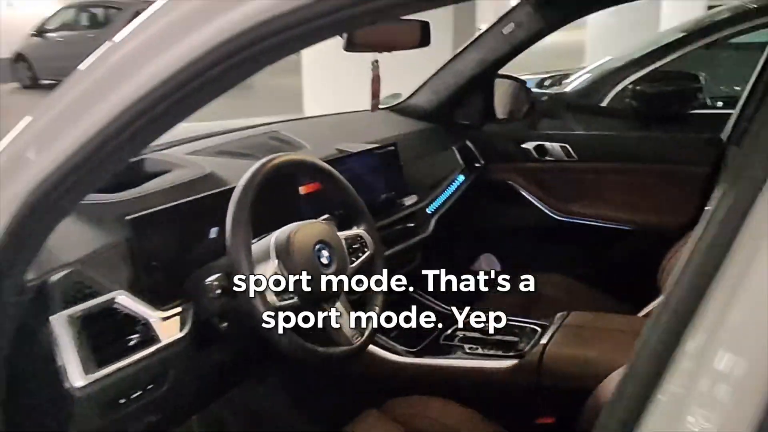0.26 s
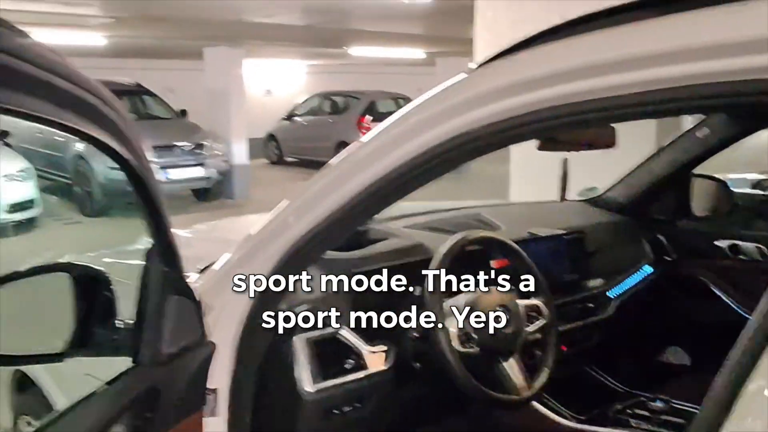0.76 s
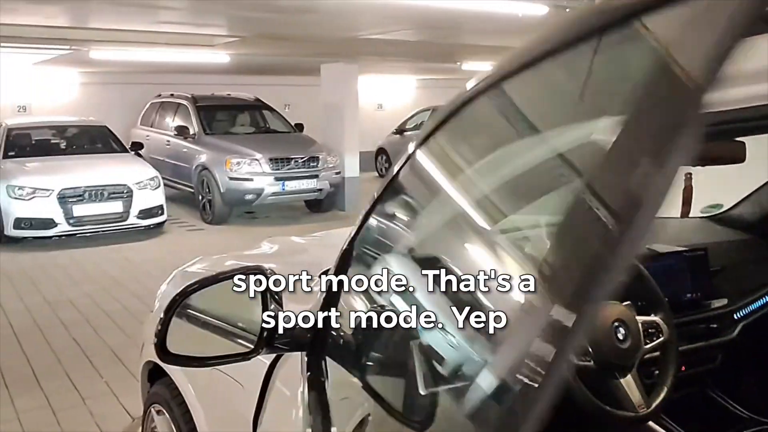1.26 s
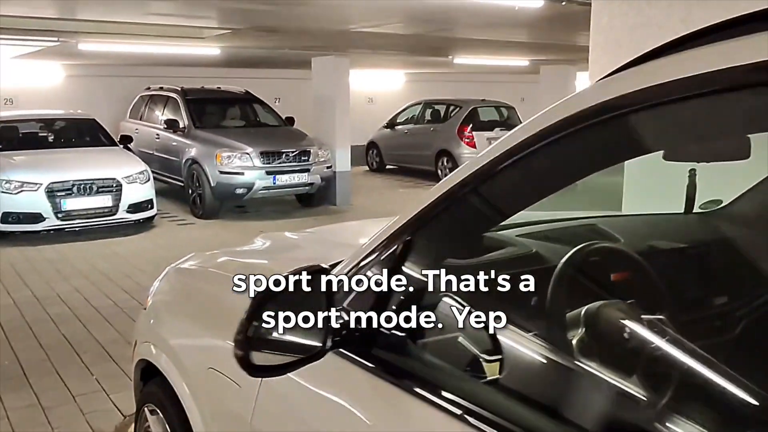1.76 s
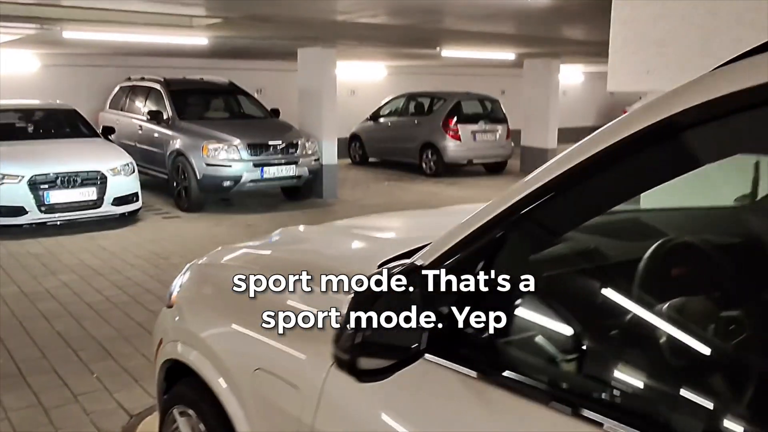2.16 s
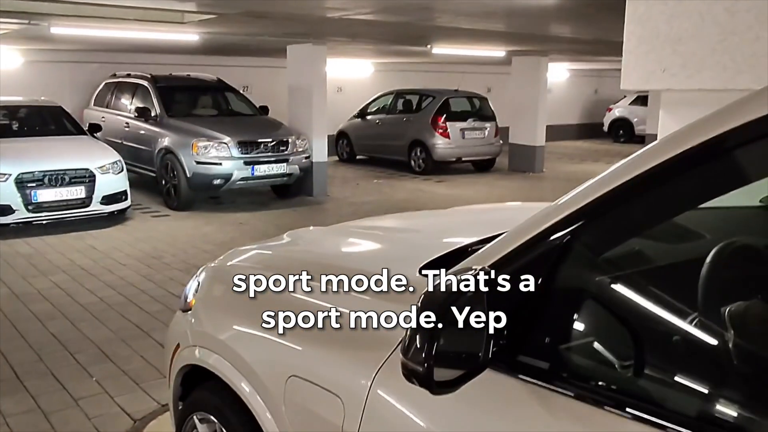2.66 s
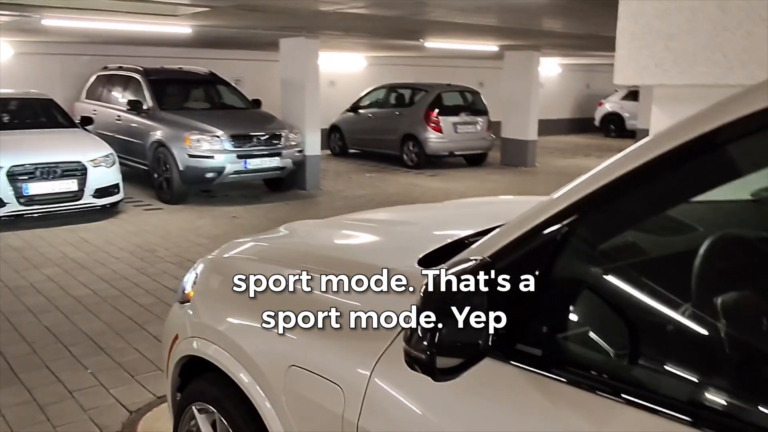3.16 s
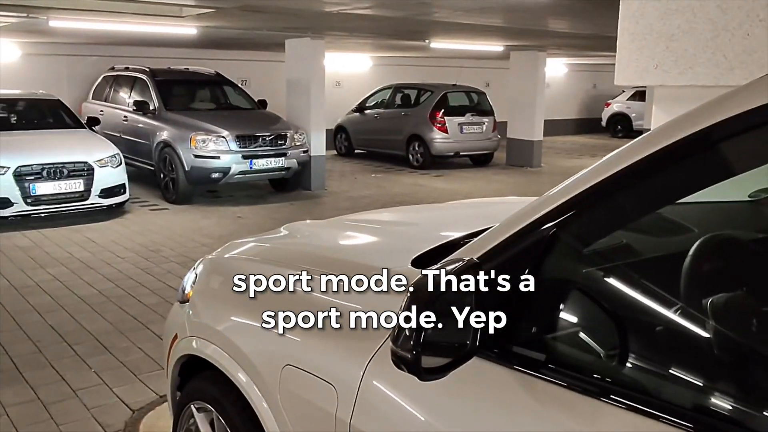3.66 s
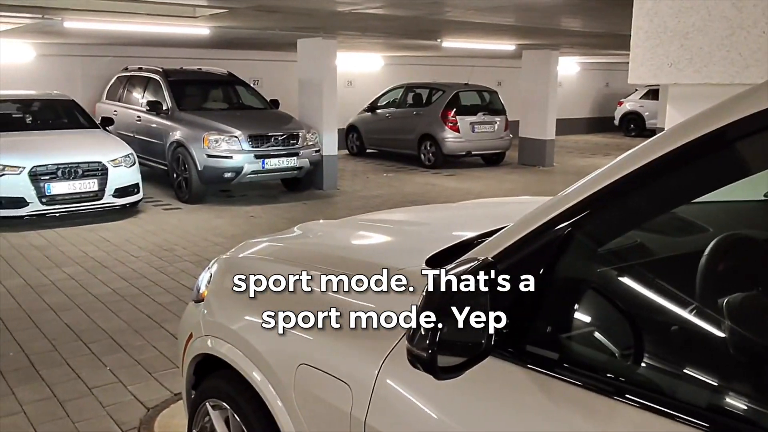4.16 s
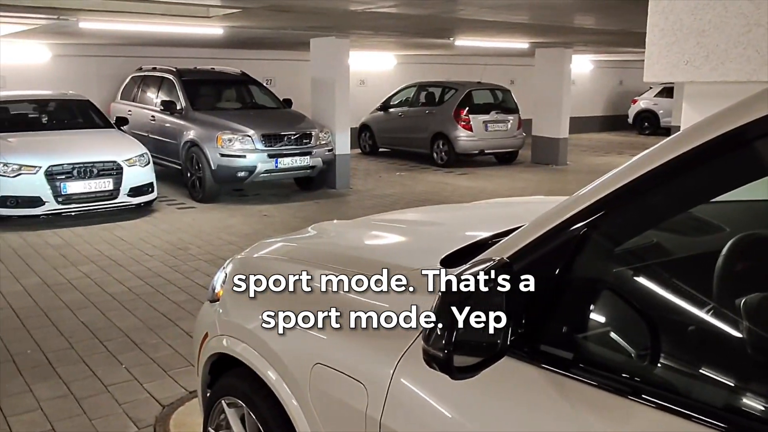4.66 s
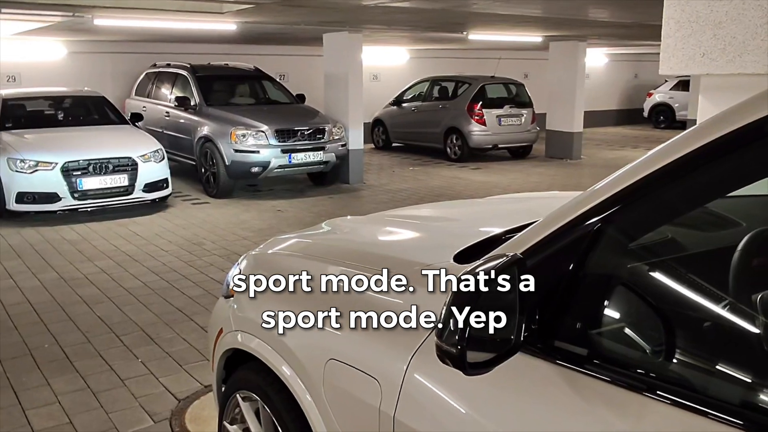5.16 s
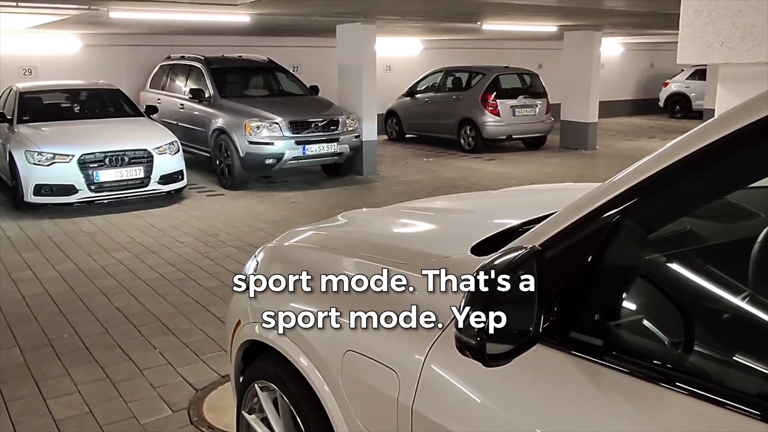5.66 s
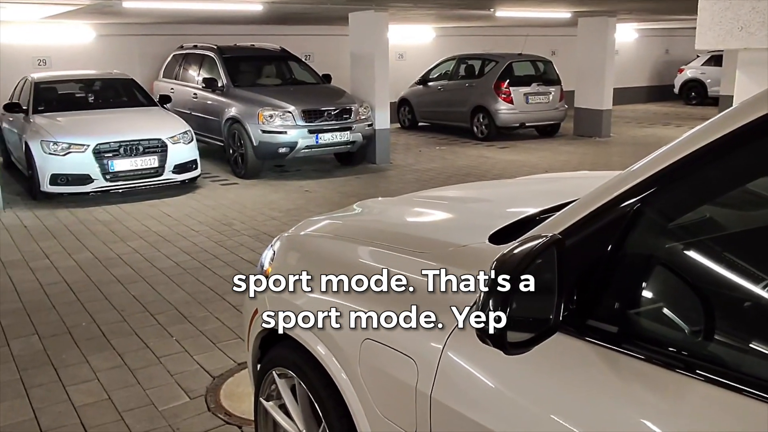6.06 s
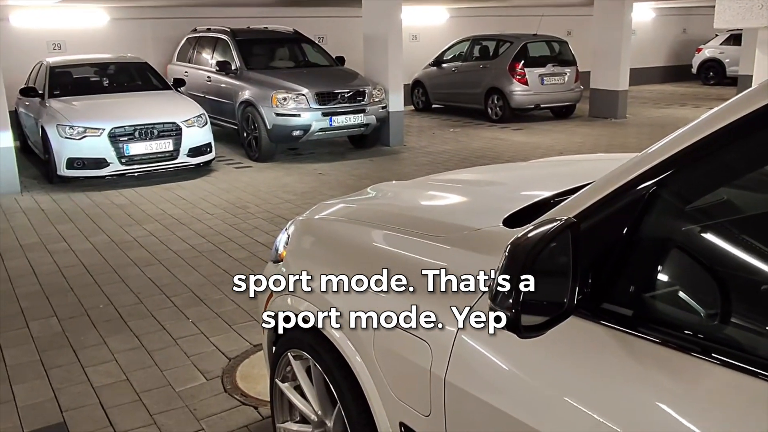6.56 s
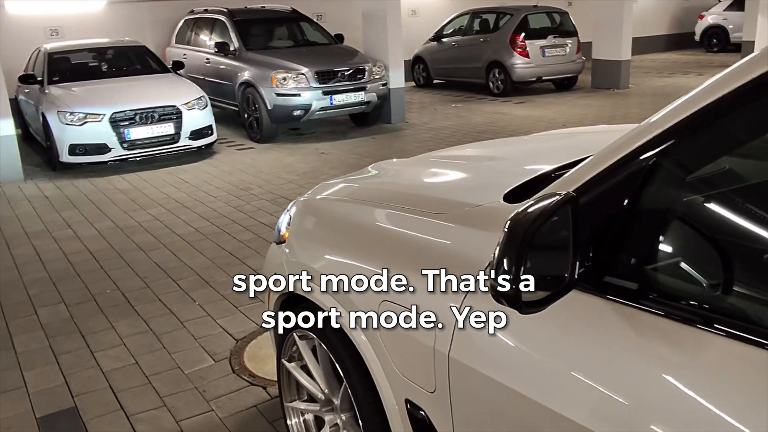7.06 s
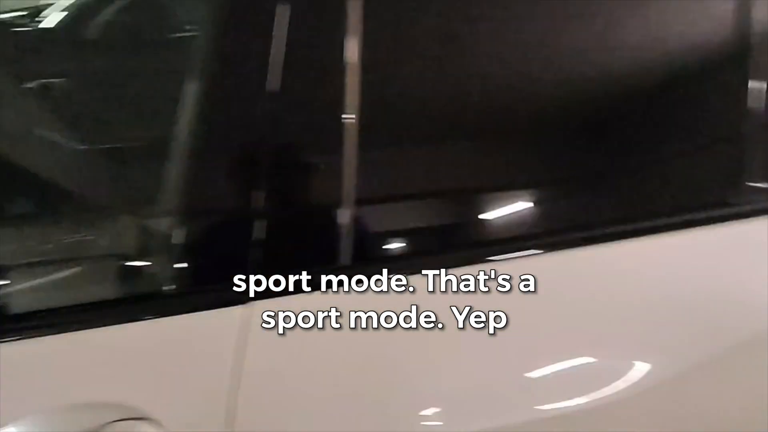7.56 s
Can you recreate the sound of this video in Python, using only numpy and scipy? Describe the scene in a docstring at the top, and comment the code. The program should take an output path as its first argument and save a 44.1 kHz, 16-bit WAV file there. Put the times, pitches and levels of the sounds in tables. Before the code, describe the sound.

Shoes scuff in an underground garage, a car door clicks and slams, a short hum follows, then a compressor spins up into a steady buzzing whine.

```python
"""A car's suspension compressor spins up and whines: each shaft turn is one blow that makes its housing ring.
Before and around it, shoes scuff, the door's check strap clicks and knocks, and the door slams:
short pushes and bursts of noise set small parts, panels and body ringing. An actuator hums as a few sine tones.
This is an underground garage: far air handling hisses and rumbles as shaped noise,
and bare concrete answers the blows with a fading noise tail."""
import sys
import numpy as np
from scipy import signal
from scipy.fft import rfft, irfft, next_fast_len
from scipy.io import wavfile
from scipy.ndimage import map_coordinates

SR = 44100
rng = np.random.default_rng(int(sys.argv[2]) if len(sys.argv) > 2 else 0)


def master(y):
    """Save y as 16-bit WAV."""
    cut = np.clip(np.atleast_2d(y).T, -1, 1)
    pcm = np.round(cut * 32767)  # scale
    wavfile.write(sys.argv[1], SR, pcm.astype(np.int16))


N = 343980
TIME_S = np.arange(N) / SR

# In every swell table, rise_s and fall_s are the times taken to climb or sink by 20 dB.
# Far hiss of the garage: pitch_hz, level_db (per Hz, relative)
AIR_TONE = [(76, -18), (130, -16), (166, -23), (233, -38.5), (329, -27), (1200, -51), (1380, -64.5),
            (1620, -53.5), (2110, -49.5), (2970, -55), (4360, -59.5), (6800, -34.5), (10400, -62),
            (14900, -42.5), (16200, -49.5)]
# Thin steady electrical tone: pitch_hz, level_db
WHISTLE = [(13840, -91)]
# Low air pushes at the microphone: peak_s, level_db, rise_s, fall_s
RUMBLE = [(.05, -62, 0.25, 0.97), (.61, -55, 0.37, 0.23), (1.1, -53, 0.15, 0.39),
          (1.75, -42.5, 0.079, 0.18), (2.0, -50.5, 0.24, 1), (3.05, -66, 0.26, 0.49),
          (4.29, -59.5, 0.25, 0.4), (5.05, -65.5, 0.49, 0.93), (6.1, -74.5, 0.6, 0.92)]
# Colour of those pushes: pitch_hz, level_db (per Hz, relative)
RUMBLE_TONE = [(18, -37.5), (28, -0.5), (40, 2.5), (63, 4.5), (81, 2), (110, -7), (140, -28), (240, -120)]
AIR_DB, RUMBLE_FLOOR_DB = -69, -77.5
# Life of the concrete's answer: pitch_hz, fade_s (time to fall 60 dB)
GARAGE = [(40, 0.46), (150, 0.45), (600, 0.43), (2500, 0.76), (6000, 0.21), (12000, 0.12)]

# Dull shuffles of clothes and feet: peak_s, level_db, rise_s, fall_s
SHUFFLES = [(.01, -61.5, .1, 0.34), (.41, -63.5, 0.19, 0.26), (.72, -60.5, 0.24, 0.17),
            (1.4, -71.5, 1, 0.25), (1.1, -63, 0.04, 0.18), (1.6, -65, 0.027, 0.3), (1.95, -54, 0.32, 0.24),
            (2.44, -63, 0.64, 0.31), (2.97, -56.5, 0.064, 0.091), (3.06, -65.5, .5, 0.21),
            (4.25, -53, 0.11, 0.093), (5.02, -58, 0.38, 0.75)]
# Colour of the shuffles: pitch_hz, level_db (per Hz, relative)
SHUFFLE_TONE = [(60, -30.5), (120, 1.5), (200, 2), (330, -1.5), (500, -7.5), (800, -7.5), (1200, -15),
                (2000, -40), (3300, -120)]
# Scuffs of shoes on the floor: peak_s, level_db, rise_s, fall_s, left_over_right_db
SCUFFS = [(.01, -60.5, 0.18, 0.49, 0), (.235, -52.5, 0.078, 0.084, 1.5), (0.39, -48, 0.0085, 0.091, 0.5),
          (0.414, -55, 0.083, 0.012, 1), (.44, -58.5, 0.024, 0.019, 12), (2.0, -68.5, 0.59, 0.79, -1),
          (2.33, -69, 0.14, 0.21, 0), (2.47, -65, .2, 0.34, -2.5), (5.17, -72.5, .4, .3, -2.5)]
# Colour of the scuffs: pitch_hz, level_db (per Hz, relative)
SCUFF_TONE = [(410, -28.5), (700, -19.5), (863, -11), (946, -33.5), (1080, -10.5), (1460, -8), (2130, -11),
              (2530, -6.5), (3840, -11), (5690, -8.5), (10400, -24), (15000, -16.5), (16000, -49)]
SHUFFLE_FLOOR_DB = -79.5
RUSTLE_DB, RUSTLE_ENDS_S = -73.5, 3.06  # faint rubbing between the scuffs until the feet rest

# Actuator hum: start_s, length_s, level_db, fade_db_per_s (below zero means it grows)
HUM = [(2.11, 0.92, -57, -1.5), (4.17, 0.13, -57.5, -9), (4.3, 0.3, -55, 31)]
HUM_HZ, HUM_EDGE_S = 120, 0.032
# Brief hollow rushes of air under the car: peak_s, level_db, rise_s, fall_s
VENT = [(4.865, -62, 0.019, 0.34), (5.19, -65, 0.2, 0.2)]
# Small cavities the air rings in: pitch_hz, width_hz, level_db (relative)
VENT_CAVITIES = [(830, 120, -11), (2300, 68, -0.5), (2490, 162, -3.5), (3220, 170, -18)]

# Small contacts: start_s, click_peak_db, knock_peak_db, click_hz, knock_hz, left_over_right_db (click)
CONTACTS = [(0.384, -45, -62, 1534, 345, 0), (0.394, -45.5, -64, 1500, 298, 0),
            (0.41, -49, -53, 1600, 308, 2), (0.447, -49, -54, 2000, 110, 0),
            (0.584, -50, -63, 2500, 420, 10), (0.589, -55, -41, 2000, 430, 21),
            (0.5941, -40.5, -38.5, 4050, 555, 14.5), (0.601, -64, -38, 2000, 307, 7),
            (0.615, -60, -47, 2500, 170, 0), (0.624, -62, -48, 1500, 197, 0),
            (0.639, -78, -48, 1500, 69, 0), (0.6826, -41, -47.5, 6200, 88, 9),
            (0.7552, -43.5, -53, 5160, 100, 8), (0.8654, -98, -51, 1630, 437, -6),
            (0.993, -68, -50, 1490, 296, -4), (1.0088, -53, -42.5, 2730, 198, 9),
            (1.02, -59, -50, 3500, 300, -5), (1.059, -62, -32, 900, 200, -10),
            (1.065, -53, -31.5, 1100, 560, -17), (1.071, -70, -39, 900, 600, -10),
            (1.078, -70, -34, 900, 150, 0), (1.113, -80, -44.5, 900, 132, 0),
            (1.2243, -60, -65, 3050, 199, -1), (1.245, -71, -72, 2800, 100, 2),
            (1.3309, -67, -44, 1510, 216, -13), (1.3416, -54, -40.5, 2300, 223, -11),
            (1.349, -68, -45, 1200, 294, -15), (1.363, -72, -50, 1500, 180, -2),
            (1.413, -54, -50, 2490, 498.3, -10), (1.4197, -55, -43.5, 2230, 885, -31.5),
            (1.5801, -80, -50.5, 2026, 183, 0), (1.948, -53.5, -42, 12230, 90.5, -7),
            (2.1855, -56.5, -53.5, 4050, 202, -19), (2.914, -53.5, -67, 4070, 116, -12),
            (2.928, -45.5, -54, 7430, 120, -10.5), (2.945, -57, -42.5, 1515, 149, -4),
            (2.973, -52, -48, 1390, 315, -14), (3.029, -59, -49.5, 1506, 168, -2),
            (4.179, -69, -48, 1180, 138, -2), (4.2, -70, -49, 900, 130, 0), (4.219, -70, -48, 890, 200, 0),
            (4.239, -53, -38.5, 678, 140, -11), (4.247, -74, -35, 900, 90, 0),
            (4.252, -66, -46, 900, 480, 0), (4.276, -72, -40, 900, 100, 0),
            (4.8512, -50.5, -40.5, 2400, 480, -4), (4.853, -68, -44, 1490, 150, -1),
            (4.875, -56, -55, 1485, 500, -1), (4.919, -61, -41.5, 1200, 91, -2),
            (4.969, -70, -51, 1200, 290, 0), (5.046, -68, -55, 1200, 266, 0),
            (5.081, -71, -61, 1196, 325, 0), (5.155, -60, -53, 1205, 274, 0),
            (5.384, -59, -55, 1220, 236, 2), (6.333, -49, -85.5, 10000, 299, -6)]
# Colour of the bright clicks: pitch_hz, level_db (per Hz, relative)
CLICK_TONE = [(470, -29), (800, 5.5), (1680, 3.5), (2350, -1.5), (4570, -5.5), (7170, -5), (10600, -23.5),
              (12800, -5), (15400, -5), (16000, -40)]
CLICK_FADE_S, CLICK_WIDTH = 0.048, 3.7  # time to fall 60 dB; width as share of the pitch
# Knock: fade time at 100 Hz; higher knocks die sooner by this power of their pitch; width as share of pitch
KNOCK_FADE_S, KNOCK_SHORTENS, KNOCK_WIDTH = 0.25, 0.29, .17
# The push behind a knock: life and share of its rough part, share that takes a broader, shorter ring
PUSH_FADE_S, PUSH_ROUGH, PUSH_BROAD = .05, .8, .2

# Contacts within the door slam: start_s, panel_and_thud_db, rattle_db (relative)
SLAM = [(1.732, -41, -34.5), (1.745, -28, -14), (1.754, -16.5, -14.5), (1.765, -25.5, -19),
        (1.776, -33.5, -27), (1.789, -50.5, -30.5)]
# Door panels: pitch_hz, level_db (relative, before random scatter), fade_s (time to fall 60 dB)
PANELS = [(31.8, -13.5, 0.99), (60, -7, 0.59), (104, -0.5, 0.37), (141, -3, 0.25), (145.5, -5.5, 0.33),
          (216, 3, 0.13), (250.3, -23, 0.19), (336.5, 0.5, 0.12), (374, -14.5, 0.17), (479, 3, 0.049),
          (548.4, 7, 0.048), (645, -30, 0.97), (780, -7, 0.047), (745, -24.5, 0.22), (1049, -9, 0.049),
          (1513, -17.5, 0.043), (1439, -26, 0.035), (1780, -25.5, .05), (2620, -24, .04)]
# Colour of the latch and trim rattle: pitch_hz, level_db (per Hz, relative)
RATTLE_TONE = [(150, -59), (350, -12), (600, -4), (717, -13.5), (1070, -20.5), (1680, -20.5), (2650, -22.5),
               (2990, -30), (5630, -31.5), (6120, -28.5), (6550, -28.5), (10700, -50), (14500, -38),
               (16000, -60)]
# Colour of the body's thud: pitch_hz, level_db (per Hz, relative)
THUD_TONE = [(15, -31.5), (25, -17), (54, 3.5), (80, -8), (110, 2), (151, -2), (381, -20), (452, -16.5),
             (565, -12), (648, -16), (800, -18.5), (1500, -36), (1950, -59.5), (3300, -120)]
# Life of the thud: pitch_hz, fade_s (time to fall 60 dB)
THUD_LIFE = [(30, 0.64), (100, 0.29), (300, 0.45), (600, 0.037), (1500, 0.057)]

# Shaft speed, a quick spin-up and then a slow sag as pressure builds: time_s, turns_hz
SPEED = [(3.05, 31), (3.15, 37.5), (3.29, 45.3), (3.35, 48.6), (3.6, 59.2), (3.66, 59.5), (3.92, 58.6),
         (4.39, 57.6), (5.26, 56.45), (6.29, 55.4), (6.49, 54.1), (6.57, 54.1), (6.63, 54.5), (6.81, 54.8),
         (7.11, 54.6), (7.56, 53.8), (7.8, 53.7)]
# Strength of the compressor's blows: time_s, level_db (relative)
BLOW_LEVEL = [(3.05, -67.5), (3.15, -63), (3.3, -61.5), (3.66, -50.5), (4.08, -51), (5.22, -51.5),
              (5.6, -52.5), (6.4, -54), (6.5, -54), (7.28, -51.5), (7.6, -54), (7.8, -54)]
# Multiples of the shaft speed that stand out or drop back: multiple, level_db (relative)
BLOW_SHAPE = [(8, 1.5), (9, -8.3), (10, -3.8), (12, 3.5), (13, 5.7), (14, 5.1), (15, -4.1), (16, -1.7),
              (20, -1.8), (21, -7.9), (22, -2.6), (23, 4.9), (25, 4.8), (27, 2.1), (31, -9.0), (32, -5.2),
              (33, -2.3), (34, -4.9), (35, -6.7), (37, -7.9), (38, -2.3), (40, 6.4), (43, 2.4), (45, 2.0),
              (47, 4.2), (49, 2.1), (50, -2.0), (54, 3.8), (55, 3.7), (58, 3.3), (60, 5.2), (61, 2.9),
              (62, 4.0), (63, 3.3)]
# Ringing of housing, brackets and body shell: pitch_hz, width_hz, level_db (relative), sign_of_ring
HOUSING = [(485.6, 24, -10.4, 1), (556.0, 31, -9.7, -1), (619.6, 35, -8.1, 1), (683.9, 85, -19.1, -1),
           (773.4, 8, -21.9, 1), (881.6, 49, 3.4, -1), (878.5, 37, 5.0, 1), (923.0, 9, -7.4, -1),
           (964.5, 21, -1.2, 1), (997.5, 31, -2.3, -1), (1044.1, 23, -5.9, 1), (1068.0, 8, -8.2, -1),
           (1087.5, 46, -8.0, 1), (1136.8, 31, 3.0, -1), (1196.5, 26, -5.9, 1), (1246.0, 11, -2.5, -1),
           (1240.8, 35, -6.0, 1), (1293.9, 16, -4.9, -1), (1311.9, 16, -3.6, 1), (1370.6, 26, -6.6, -1),
           (1424.0, 14, -15.3, 1), (1444.1, 10, -14.8, -1), (1561.4, 15, -19.1, 1), (1599.1, 18, -15.7, -1),
           (1667.0, 23, -17.2, 1), (1733.5, 64, -1.1, -1), (1771.3, 98, 2.4, 1), (1801.8, 67, 1.7, -1),
           (1895.0, 35, -5.1, 1), (1932.2, 29, 1.0, -1), (1975.0, 57, -3.5, 1), (2103.5, 19, -7.0, -1),
           (2132.7, 18, -16.8, 1), (2218.6, 106, -2.2, -1), (2215.2, 160, -3.4, 1), (2333.6, 52, -15.0, -1),
           (2423.3, 61, -19.7, 1), (2549.9, 22, -14.1, -1), (2598.1, 17, -18.1, 1), (2681.0, 34, -14.4, -1),
           (2748.1, 32, -17.9, 1), (2865.1, 62, -15.8, -1), (2963.7, 21, -10.0, 1), (3065.0, 89, -11.0, -1),
           (3106.0, 95, -12.4, 1), (3225.8, 24, -16.5, -1), (3317.0, 160, -21.4, 1),
           (3335.0, 28, -16.8, -1), (3421.6, 43, -20.1, 1), (3528.8, 53, -20.1, -1), (3660.0, 54, -21.6, 1)]
# Ringing of the valve plate: pitch_hz, width_hz, level_db (relative)
PLATE = [(3890, 56, -16), (4180, 83, -23.5), (4437, 35, -14.5), (4600, 60, -18.5), (4894, 43, -19),
         (5224, 59, -19.5), (5580, 59, -19.5), (5860, 90, -25.5), (7310, 150, -23)]
# Colour of the air through the valves: pitch_hz, level_db (per Hz, relative)
VALVE_AIR_TONE = [(240, -13.5), (400, -8), (620, -16), (790, -16), (1000, -6), (1350, -8), (1550, -14.5),
                  (1950, -13.5), (2300, -15), (3050, -16), (3600, -16), (4100, -23), (4600, -17.5),
                  (7500, -26), (8900, -27.5), (10300, -49), (13300, -21.5), (16000, -70)]
# How alike left and right are in the valve air: pitch_hz, likeness (1 = same, -1 or less = opposite)
VALVE_AIR_LIKENESS = [(60, -1.1), (180, 0.54), (550, -0.35), (1650, 0.52), (4970, 0.92), (15000, -0.3)]
# Colour while the shaft is slow: pitch_hz, width_hz, added_gain
SPIN_UP = [(620, 350, -0.14), (800, 160, .5), (1000, 120, -0.64), (1120, 60, 0.28), (1400, 150, 0.84),
           (1854, 210, -0.41), (2000, 240, -0.46), (2160, 82, 0.25), (2520, 230, 1), (3350, 200, .6),
           (5000, 1500, -.4)]
# Colour once the listener has shifted nearer the wheel: pitch_hz, width_hz, added_gain
NEARER = [(5050, 360, 0.86), (2220, 200, 0.29), (2000, 150, -0.21), (1322, 170, -0.018), (3300, 270, -0.28)]
# Colour midway through the listener's turn: pitch_hz, width_hz, added_gain
PASSING = [(2180, 180, 0.46), (2590, 370, 0.32), (828, 170, -0.35), (4900, 300, 0.32)]
# Colour after the turn: pitch_hz, width_hz, added_gain
TURNED = [(1113, 130, 0.73), (1190, 90, -0.83), (1902, 820, -0.6), (2196, 170, -.6), (2567, 320, 0.36),
          (2780, 150, 0.42), (2900, 150, -0.91), (3260, 200, 0.85), (4600, 330, -0.9), (5300, 250, 0.78)]
# Slow wander of the ring's level: pitch_hz, wander_db
DRIFT = [(600, .5), (2000, 1), (3500, 1.6), (6000, 3)]
FIRST_BLOW_S, AIR_BUILDS_S = 3.079, 0.068  # air noise is full this long after the first blow
# Air noise at full flow; its loss per turn per second below that speed
VALVE_DB, VALVE_DB_PER_HZ, FULL_FLOW_HZ = -63, 0.35, 55.5
SPIN_UP_S, NEARER_S = (3.595, 3.6), (6, 6.8)  # slow-shaft colour fades out; nearer colour fades in
TURN_S = 7.1, 7.58  # the listener turns along the car
# Before and after the turn: left over right, then extra travel time and level of the path off the floor
PAN_DB, BOUNCE_S, BOUNCE_DB = (-3, 6), (0.0021, .0042), (-41, -13)
SMEAR_TURNS, SLOW_SMEAR_TURNS = .006, .02  # spread of a blow per multiple, at speed and while slow
UNEVEN_DB = .3  # extra scatter of the blows while the shaft is slow
TREBLE_DB, TREBLE_HOLDS = 1.5, 0.58  # lift above 1.6 kHz; share of level drift the treble does not follow
SCATTER_S, SCATTER_HZ = .003, 70  # paths round the car: spread of the delay, width of a band
TOP_HZ = 15700


def amp(db):
    """Turn decibels into a plain gain."""
    return 10 ** (np.asarray(db) / 20)


def unit(x):
    """Scale to an average strength (rms) of 1."""
    return x / np.sqrt(np.mean(x ** 2) + 1e-20)


def along(points, hz):
    """Read a pitch table between its points, on a log pitch axis."""
    f, v = np.transpose(points)
    return np.interp(np.log(hz + 1), np.log(f + 1), v)


def timeline(rows):
    """Read a time table as one value per sample."""
    return np.interp(TIME_S, *np.transpose(rows))


def wobble(rate):
    """A smooth random curve with this many random points a second."""
    points = rng.standard_normal(int(N * rate / SR) + 4)
    return map_coordinates(points, [np.arange(N) * rate / SR])


def ramp(start_s, end_s):
    """Climb in a straight line from 0 to 1."""
    return np.clip((TIME_S - start_s) / (end_s - start_s), 0, 1)


def swell(s, db, rise_s, fall_s):
    """A gain that climbs to a peak and sinks again, straight in dB."""
    t = TIME_S - s
    return amp(db - 20 * np.where(t < 0, -t / max(rise_s, .005), t / max(fall_s, .005)))


def swells(rows, floor_db):
    """Several swells over a steady floor, powers added."""
    return np.sqrt(sum(swell(*row) ** 2 for row in rows) + amp(floor_db) ** 2)


def filtered(x, response):
    """Recolour a sound by a gain and phase for each pitch."""
    m = next_fast_len(x.shape[-1] + SR // 4)
    return irfft(rfft(x, m) * response(np.fft.rfftfreq(m, 1 / SR)), m)[..., :x.shape[-1]]


def mode(hz, centre, width):
    """One resonance: strongest at its centre; a narrow one rings longer."""
    return 1j * hz * width / (centre ** 2 - hz ** 2 + 1j * hz * width)


def resonator(modes):
    """Several resonances added with alternating sign."""
    return lambda f: sum((-1) ** k * amp(db) * mode(f, hz, w) for k, (hz, w, db) in enumerate(modes))


def prompt(response):
    """Keep the colour but bring its energy as early as possible (minimum phase)."""
    def early(f):
        c = irfft(np.log(np.abs(response(f)) + 1e-6))
        c[1:len(c) // 2] *= 2
        c[len(c) // 2 + 1:] = 0
        return np.interp(f, np.linspace(0, f[-1], len(c) // 2 + 1), np.exp(rfft(c)))
    return early


def sides(pan_db):
    """Left and right gains for a level difference."""
    return amp(np.multiply.outer([.5, -.5], pan_db))


def rush(spectrum, alike, count=None):
    """Coloured stereo noise of rms 1; mixing a middle and a side noise sets how alike the ears are."""
    def middle_and_side(hz):
        angle = np.arccos(np.clip(along(alike, hz), -1, 1)) / 2
        return amp(along(spectrum, hz)) * [np.cos(angle), np.sin(angle)]
    mid, side = filtered(rng.standard_normal((2, count or N)), middle_and_side)
    return unit(np.array([mid + side, mid - side]))


def dying(x, life):
    """Let each pitch fade at its own speed."""
    hz, t, z = signal.stft(x, SR, nperseg=512)
    fade = amp(-60 * t / along(life, hz)[:, None])
    return signal.istft(z * fade, SR, nperseg=512)[1][..., :x.shape[-1]]


def background():
    """Far air handling as steady hiss, with a thin tone and lumpy low air."""
    lumps = swells(RUMBLE, RUMBLE_FLOOR_DB) * amp(1.0 * wobble(49) + 1.1 * wobble(1.6))
    tone = sum(amp(db + wobble(3.7)) * np.sin(2 * np.pi * hz * TIME_S) for hz, db in WHISTLE)
    low = rush(RUMBLE_TONE, [(50, .99)])
    hiss = amp(AIR_DB) * rush(AIR_TONE, [(150, 0.12), (1000, 0.52), (6000, .1)])
    return hiss + tone + lumps * low


def garage(x):
    """Many reflections off concrete merge into a fading noise tail after a short gap."""
    tail = dying(rng.standard_normal((2, SR)), GARAGE)
    both = tail.mean(axis=0)
    # long waves reach both sides alike
    tail = both + filtered(tail - both, lambda f: 1 / (1 + (900 / (f + 1)) ** 2))
    late = np.pad(x.mean(axis=0), (600, 0))[None]  # gap in samples
    return signal.fftconvolve(late, tail / np.linalg.norm(tail[0]), axes=1)[:, :N]


def moves():
    """Rubbing makes noise: soles scuff in soft swishes, clothes and feet shuffle dully."""
    rustle = amp(RUSTLE_DB) * (1 - ramp(RUSTLE_ENDS_S, RUSTLE_ENDS_S + 0.28))
    power = sum((swell(*row) * sides(pan_db)[:, None]) ** 2 for *row, pan_db in SCUFFS)
    scuffs = np.sqrt(power + rustle ** 2)
    grit = amp(1.5 * wobble(250))
    shuffle = rush(SHUFFLE_TONE, [(300, 0.22)]) * amp(1.2 * wobble(30))
    swish = scuffs * grit * rush(SCUFF_TONE, [(1000, 0.074), (8000, 0.12)])
    return swish + shuffle * swells(SHUFFLES, SHUFFLE_FLOOR_DB)


def hum():
    """A small actuator drones through the body: a low tone with faint overtones."""
    on = 0
    for s, length, db, fade in HUM:
        gate = ramp(s, s + HUM_EDGE_S) * (1 - ramp(s + length, s + length + HUM_EDGE_S))
        on = on + gate * amp(db - fade * np.maximum(TIME_S - s, 0))
    phase = 2 * np.pi * HUM_HZ * TIME_S
    tone = np.sin(phase) + amp(-24.5) * np.sin(2 * phase) + amp(-33) * np.sin(4 * phase)
    return on * amp(0.39 * wobble(26.6)) * tone


def vent():
    """Rushing air makes noise that rings in a few small cavities."""
    hiss = filtered(rng.standard_normal(N), resonator(VENT_CAVITIES))
    return swells(VENT, -120) * amp(1.3 * wobble(40)) * unit(hiss)


def click_sound(t, burst, pitch_hz):
    """A bright burst of noise around one pitch, quickly fading."""
    def colour(f):
        tone = mode(f, pitch_hz, CLICK_WIDTH * pitch_hz) ** 2 * amp(along(CLICK_TONE, f))
        return tone / (1 + 1j * f / (4.6 * pitch_hz)) ** 2
    return filtered(burst, colour) * amp(-60 * t / CLICK_FADE_S) * (1 - np.exp(-t / 0.00014))


def knock_sound(t, rough, pitch_hz):
    """One push with a rough tail makes a part ring dully and briefly."""
    tail = rough * amp(-60 * t / PUSH_FADE_S) * np.sqrt(6 * np.log(10) / (PUSH_FADE_S * SR))
    push = PUSH_ROUGH * tail + (t == 0)

    def colour(f):
        ring = mode(f, pitch_hz, KNOCK_WIDTH * pitch_hz)
        broad = mode(f, 0.99 * pitch_hz, 3.4 * pitch_hz) ** 2
        return (ring + PUSH_BROAD * broad) / (1 + 1j * f / (2.3 * pitch_hz)) ** 2
    fade_s = KNOCK_FADE_S * (100 / pitch_hz) ** KNOCK_SHORTENS
    return filtered(push, colour) * amp(-60 * t / fade_s)


def contacts():
    """When small hard parts meet, each contact gives a bright click and a dull knock."""
    out, t = np.zeros((2, N + SR)), np.arange(SR // 6) / SR
    for s, click_db, knock_db, click_hz, knock_hz, pan_db in CONTACTS:
        burst, rough = rng.standard_normal((2, len(t)))
        click = click_sound(t, burst, click_hz)
        knock = knock_sound(t, rough, knock_hz)
        click *= amp(click_db) / np.abs(click).max()
        knock *= amp(knock_db) / np.abs(knock).max()
        out[:, round(s * SR):][:, :len(t)] += sides(pan_db)[:, None] * click + knock
    return out[:, :N]


def slam():
    """Seal, striker and latch meet in quick succession: panels boom, the body thuds, metal rattles."""
    out, t = np.zeros((2, N + SR)), np.arange(SR) / SR
    for s, panel_db, rattle_db in SLAM:
        boom = 0
        for hz, db, fade_s in PANELS:
            gain = amp(db + rng.normal(0, 4.3) - 60 * t / fade_s)
            boom = boom + gain * np.sin(2 * np.pi * hz * t) * rng.choice([-1, 1])
        thud = amp(-2.0) * dying(rush(THUD_TONE, [(60, 0.97), (300, 0.84)], count=SR), THUD_LIFE)
        rattle = rush(RATTLE_TONE, [(1000, 1.0), (6000, 0.11)], count=SR)
        rattle *= amp(rattle_db - 60 * t / 0.068) * sides(-1.3)[:, None]
        onset = 1 - np.exp(-t / 0.002)
        out[:, round(s * SR):][:, :SR] += (amp(panel_db) * (boom + thud) + rattle) * onset
    return out[:, :N]


def scattered(f):
    """Paths round the car delay each band differently without changing its strength."""
    bands = rng.standard_normal(256)
    delay_s = SCATTER_S * (2 + map_coordinates(bands, [f / SCATTER_HZ], mode="mirror"))
    return np.exp(-2j * np.pi * np.cumsum(delay_s) * f[1])


def drifting(x):
    """Bands of the sound swell and fade slowly, each on its own."""
    hz, t, z = signal.stft(x, SR, nperseg=1024)
    knots = rng.standard_normal((160, 16))
    field = map_coordinates(knots, np.meshgrid(hz / 150, t * 1.7, indexing="ij"), order=1)
    gain = amp(along(DRIFT, hz)[:, None] * unit(field))
    return signal.istft(z * gain, SR, nperseg=1024)[1][:N]


def shaft_blows(turn, knock_db, slow):
    """Each shaft turn gives one blow, built from whole multiples of the shaft speed."""
    multiples = np.arange(8193)
    which, lift_db = np.transpose(BLOW_SHAPE)
    shape_db = np.bincount(which.astype(int), weights=lift_db, minlength=len(multiples))
    levels = (multiples <= 130) * amp([0 * shape_db, shape_db])
    smear = np.array([SLOW_SMEAR_TURNS * (multiples - 25) ** 2, SMEAR_TURNS * multiples ** 2])
    cycles = irfft(levels * np.exp(-1j * np.pi * smear)) * 8192
    plain, shaped = (np.interp(turn, np.linspace(0, 1, len(c) + 1), np.append(c, c[0])) for c in cycles)
    blows = shaped + slow * (plain - shaped)  # plain while slow, shaped at speed
    blows *= amp(knock_db + (.6 + UNEVEN_DB * slow) * wobble(60))
    return blows * ramp(FIRST_BLOW_S - .004, FIRST_BLOW_S)


def compressor_body(f):
    """Housing and valve plate ring together; the plate counts mostly above 3.6 kHz."""
    shell = sum(sign * amp(db) * mode(f, hz, w) for hz, w, db, sign in HOUSING)
    plate = abs(resonator(PLATE)(f)) / (1 + (3600 / (f + 1)) ** 12)
    return np.hypot(abs(shell), plate) / (1 + (420 / (f + 1)) ** 6)


def compressor():
    """Each turn of the shaft strikes housing and valve plate once and puffs air through the valves."""
    speed, knock_db = timeline(SPEED), timeline(BLOW_LEVEL)
    turned, slow = ramp(*TURN_S), 1 - ramp(*SPIN_UP_S)
    pan_db, extra_s, bounce_db = (a + (b - a) * turned for a, b in (PAN_DB, BOUNCE_S, BOUNCE_DB))
    turn = np.cumsum(speed * (1 + .0001 * wobble(30))) / SR
    turn = (turn - turn[round(FIRST_BLOW_S * SR)]) % 1  # place within the current turn

    ring = filtered(shaft_blows(turn, knock_db, slow), prompt(compressor_body)) * amp(-5.5)
    ring = filtered(ring, scattered)
    ring += amp(bounce_db) * np.interp(np.arange(N) - extra_s * SR, np.arange(N), ring)

    treble = filtered(ring, lambda f: 1 / (1 + (1600 / (f + 1)) ** 8))
    drift_db = np.clip(np.median(knock_db) - knock_db, -4, 2.5)
    treble_db = TREBLE_DB + TREBLE_HOLDS * drift_db - 5 * (1 - ramp(1.8, 3.3))
    ring += (amp(treble_db) - 1) * treble

    midway = 4 * turned * (1 - turned)
    nearer = ramp(*NEARER_S) - turned
    for share, colour in (slow, SPIN_UP), (nearer, NEARER), (midway, PASSING), (turned, TURNED):
        ring += share * filtered(ring, lambda f: sum(gain * mode(f, hz, w) for hz, w, gain in colour))

    def right_first(f):
        lead = np.minimum(np.pi * f * 1.2e-4, 1.1)  # phase in radians
        return np.exp(np.multiply.outer([-1j, 1j], lead))
    ring = filtered(drifting(ring)[None], right_first)

    puff = 1 + 0.12 * np.cos(2 * np.pi * (turn - .15))
    missing_hz = np.maximum(FULL_FLOW_HZ - np.maximum.accumulate(speed), 0)  # uses top speed so far
    air = amp(VALVE_DB - VALVE_DB_PER_HZ * missing_hz) * puff * rush(VALVE_AIR_TONE, VALVE_AIR_LIKENESS)
    air_on = ramp(FIRST_BLOW_S - .03, FIRST_BLOW_S + AIR_BUILDS_S)
    return sides(pan_db) * (ring + air_on * air)


def scene():
    """Add all sources; door, contacts and a little of the compressor also feed the echo."""
    door, small, motor = slam(), contacts(), compressor()
    echo = garage(amp(-20.5) * door + amp(-15.0) * small + amp(-17) * motor)
    return door + small + motor + echo + hum() + vent() + moves() + background()


def record(dry):
    """Keep only pitches below the top limit."""
    return filtered(dry, lambda hz: hz < TOP_HZ)


dry = scene()
out = record(dry)
master(out)
```